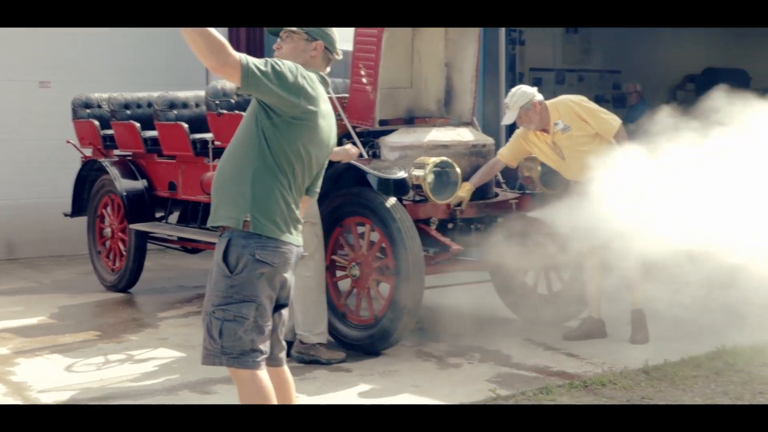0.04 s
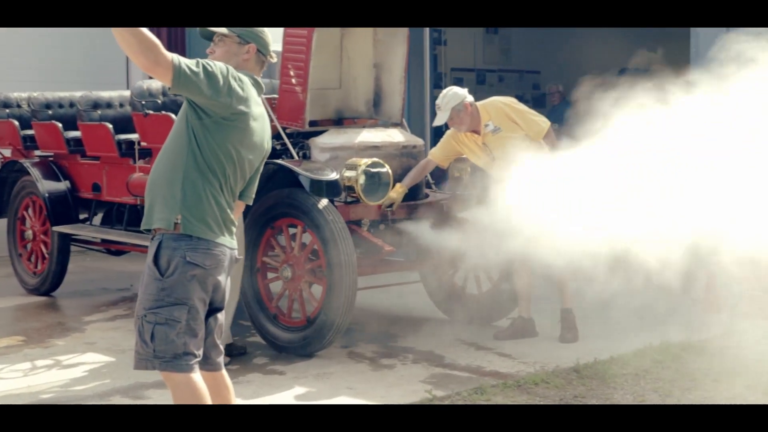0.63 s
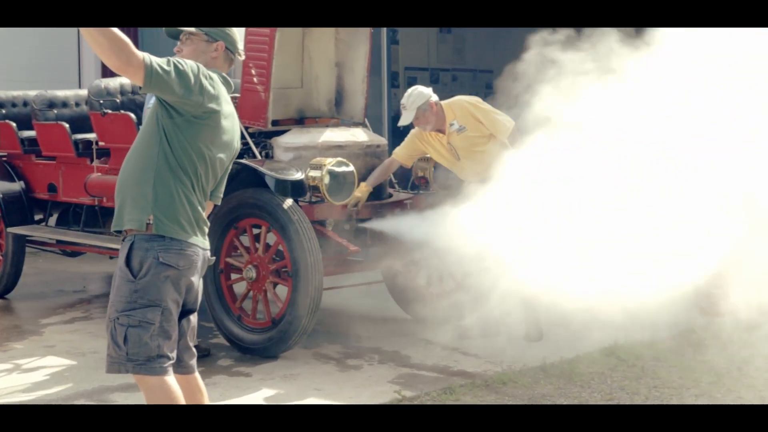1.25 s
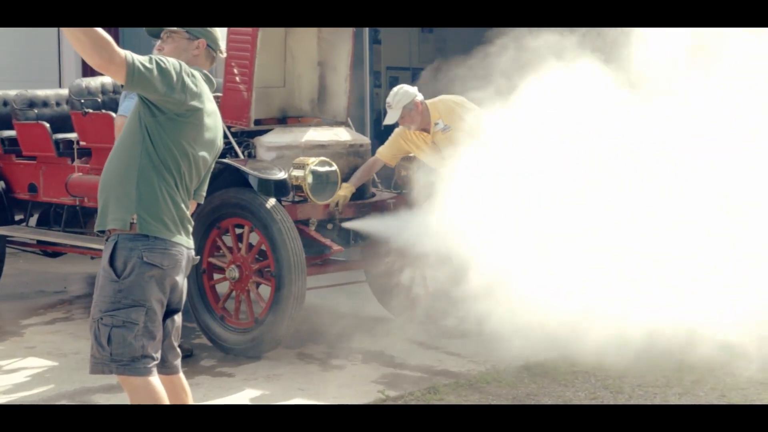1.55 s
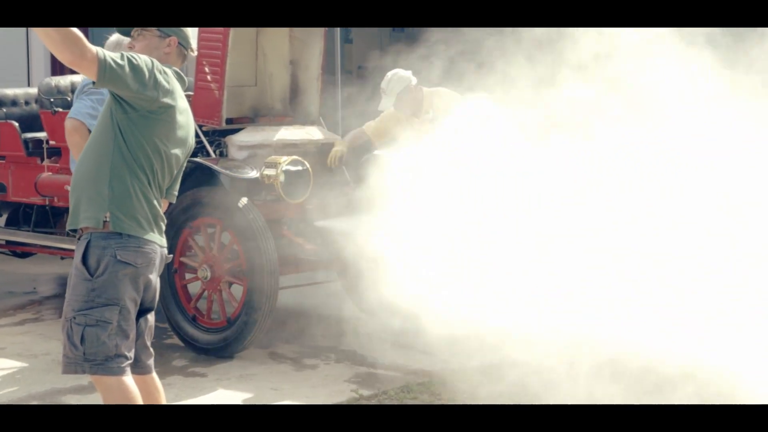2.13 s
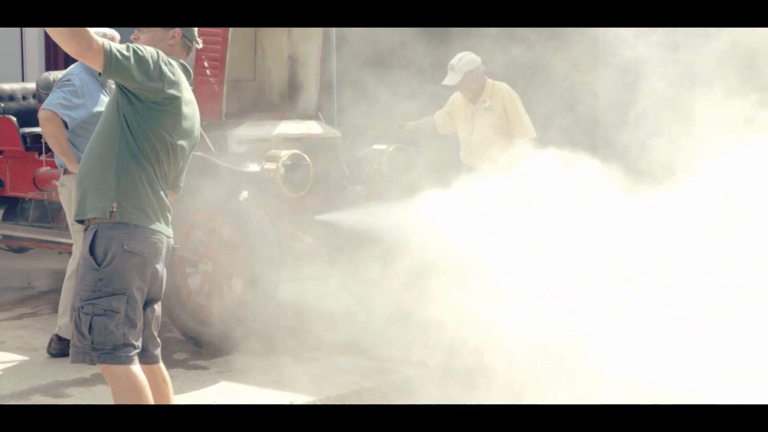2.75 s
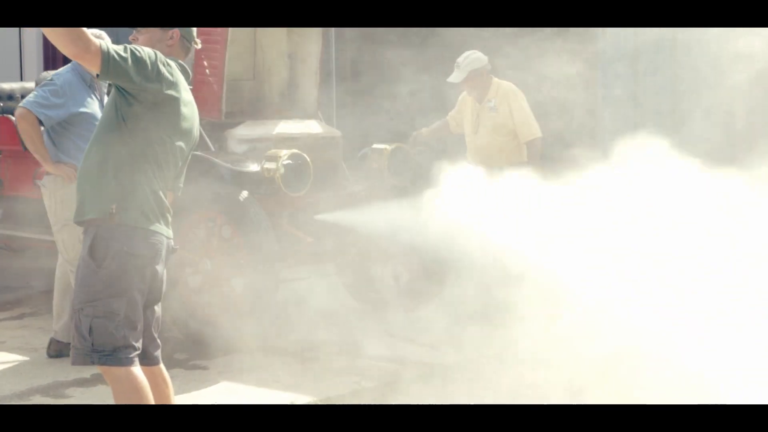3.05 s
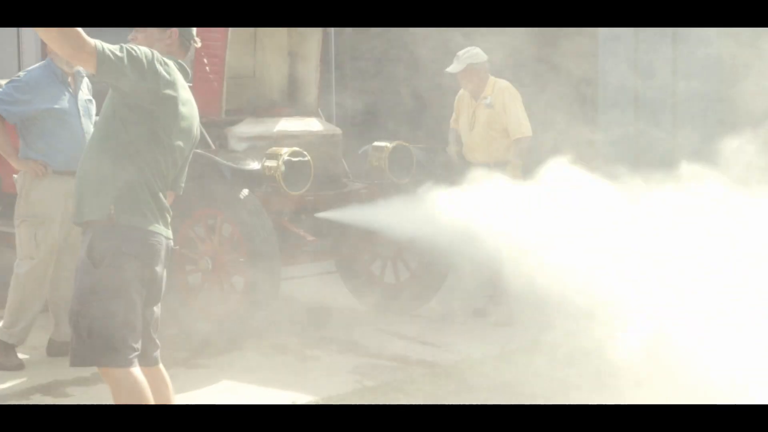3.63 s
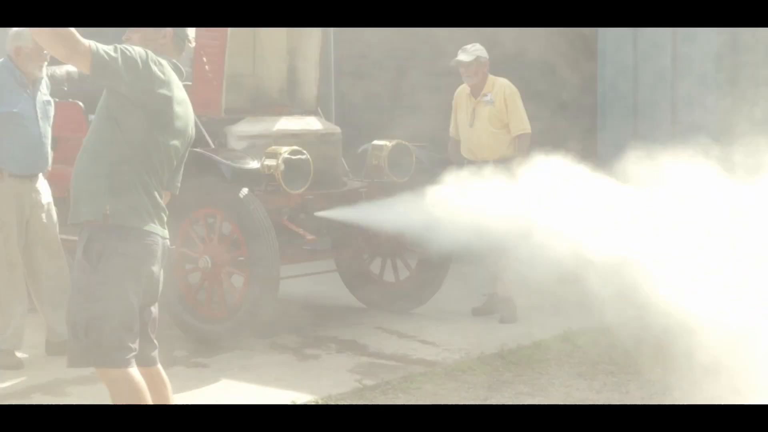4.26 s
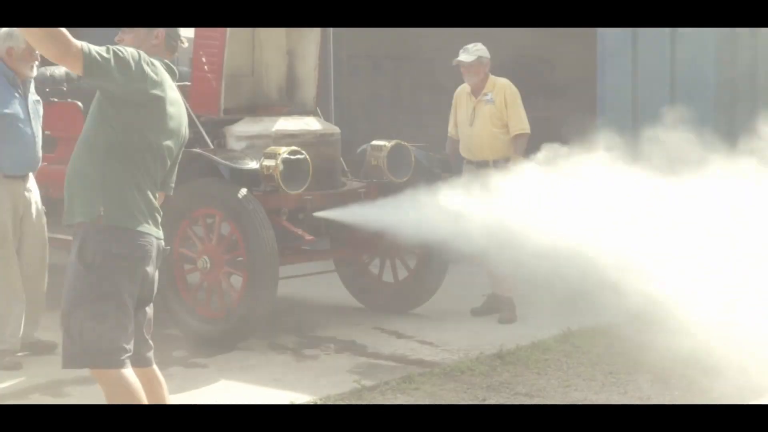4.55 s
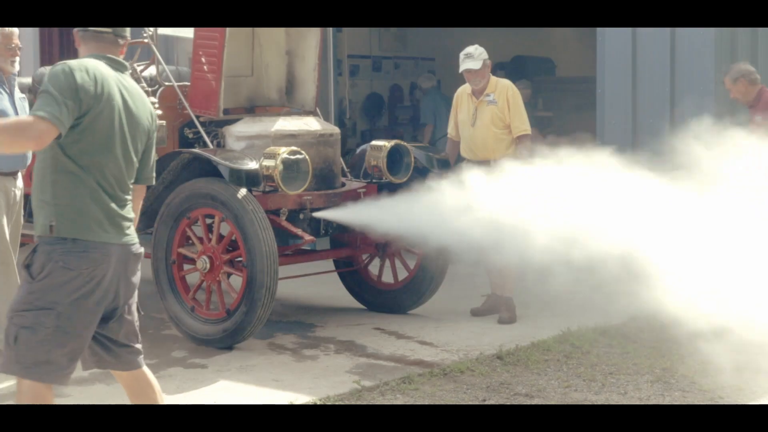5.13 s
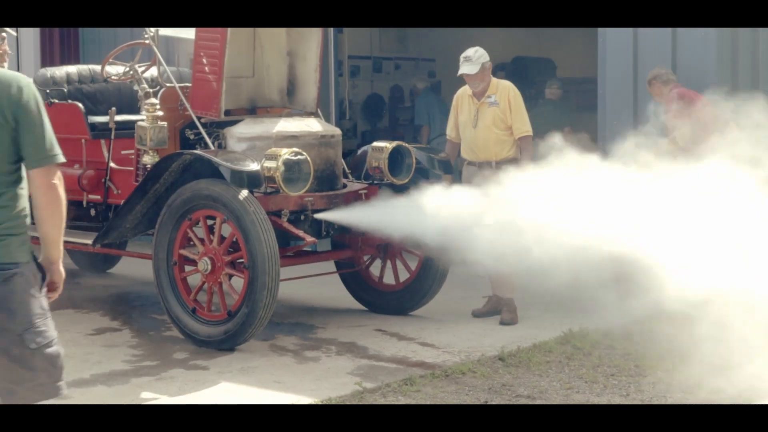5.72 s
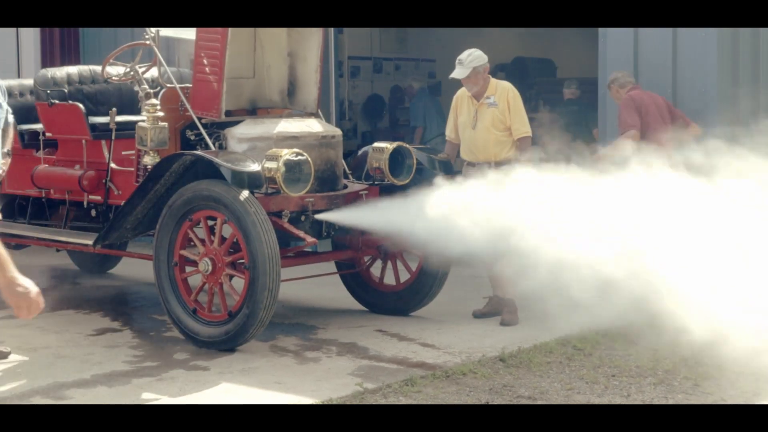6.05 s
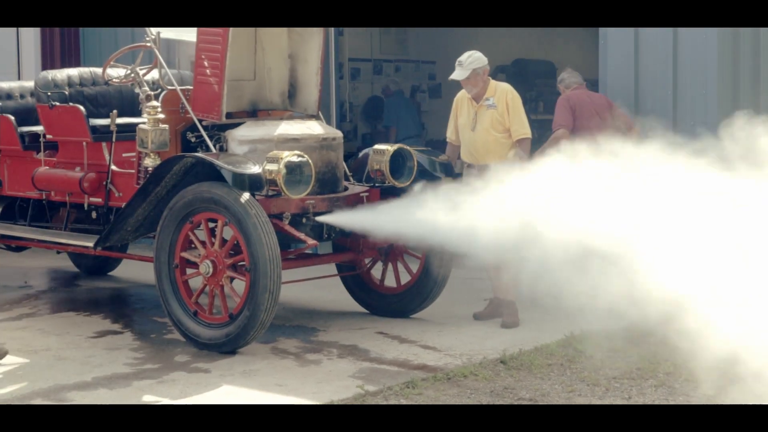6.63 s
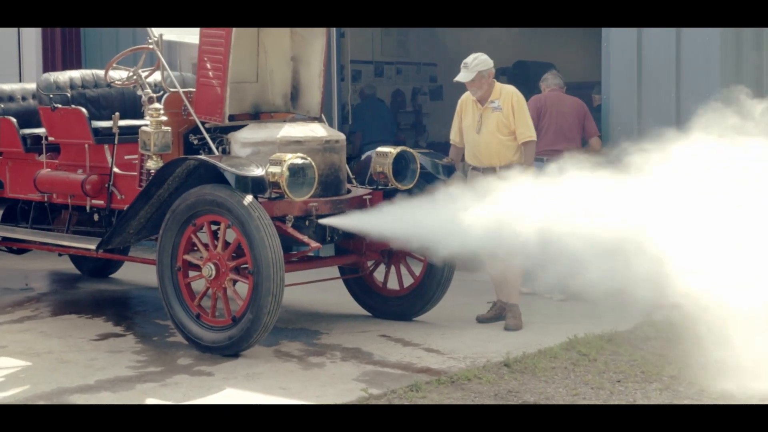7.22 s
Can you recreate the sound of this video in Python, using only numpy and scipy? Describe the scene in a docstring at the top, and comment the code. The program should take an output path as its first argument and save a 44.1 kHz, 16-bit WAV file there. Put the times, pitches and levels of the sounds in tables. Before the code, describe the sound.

Steam blows off from an old car's valve outdoors, a throttled, faintly whistling roar opening into a bright, steady hiss.

```python
"""Outdoors, a few metres from an old steam car: steam blows off from a valve low on its front.
The jet first roars half throttled, with faint whistles, then opens into a bright, steady hiss.
Its turbulence is coloured by the valve passage and the outlet pipe. Pavement, car body and garage
front reflect it, and the billowing plume adds a faint rumble."""
import sys
import numpy as np
from scipy import signal
from scipy.fft import rfft, irfft
from scipy.io import wavfile
from scipy.ndimage import map_coordinates

SR = 44100
rng = np.random.default_rng(int(sys.argv[2]) if len(sys.argv) > 2 else 0)


def int16_out(signal):
    """Quantize to a 16-bit WAV file."""
    q = np.round(np.clip(np.atleast_2d(signal).T, -1, 1) * 32767)
    wavfile.write(sys.argv[1], SR, q.astype(np.int16))


N = 325458
TIME = np.arange(N) / SR
FREQ = np.maximum(np.arange(N // 2 + 1) * SR / N, 1)


def valve(opening, surge, bright_db):
    """The throttled roar crossfades into the open hiss; a little of it lingers through the surge."""
    # turbulence at the valve, throttled and wide open: (frequency [Hz], relative level [dB])
    throttled_eq = [(400, -60), (590, -41), (710, -23.5), (1120, -17), (1490, -17.5), (1860, -0.5),
                    (2970, -8.5), (4370, -8.5), (4970, -4.5), (6760, -9), (7190, -13.5), (9970, -25.5),
                    (11760, -27), (15500, -39)]
    open_eq = [(400, -60), (590, -33.5), (720, -11), (1080, -13), (1430, -9.5), (1710, -12.5), (1830, -3.5),
               (3670, -6), (4740, -3), (6660, -8.5), (7180, -14.5), (11360, -17), (13030, -23),
               (15500, -26)]
    # resonances (+) and notches (-) of the valve passage: (frequency [Hz], width [Hz], gain [dB])
    throttled_modes = [(765, 325, 18.5), (1290, 400, 9.5), (2626, 70, 5), (3090, 410, 7), (3664, 140, -7.5),
                       (3760, 320, 9.5), (4840, 230, 6.5), (5580, 120, -6), (5710, 150, 2.5),
                       (9000, 340, -4), (9900, 480, 4.8)]
    open_modes = [(1192, 63, 4), (2352, 124, 6), (2517, 570, -8), (2940, 120, 2), (6130, 250, -3.5)]
    # each layer varies about its own average brightness
    roar_bright_db = bright_db - np.average(bright_db, weights=1 - opening)
    hiss_bright_db = bright_db - np.average(bright_db, weights=opening)
    roar = jet(outlet(throttled_eq, throttled_modes), roar_bright_db, flicker_hz=10, sputter_hz=25)
    hiss = jet(outlet(open_eq, open_modes), hiss_bright_db, flicker_hz=7.8, sputter_hz=23)
    roar_power = 1 - opening + 0.15 * opening * surge
    return np.sqrt(roar_power) * roar + np.sqrt(opening) * hiss


def jet(eq, bright_db, flicker_hz, sputter_hz):
    """Turbulent hiss in ten bands: each flickers alone, while the treble brightens and sputters as one."""
    spectrum = noise_spectrum(eq)
    sputter_db = .65 * drift(sputter_hz)
    centres_hz = np.geomspace(700, 14000, num=10)
    hiss = 0
    for hz, solo in zip(centres_hz, np.eye(len(centres_hz))):
        band = irfft(spectrum * np.interp(np.log(FREQ), np.log(centres_hz), solo), N)
        sensitivity = 1.7 / (1 + (9000 / hz) ** 4) - .1  # the finest eddies react most to the flow
        flicker_db = .4 * drift(flicker_hz)
        hiss += band * undb(sensitivity * (bright_db + sputter_db) + flicker_db)
    return hiss


def outlet(turbulence, modes, pipe_spacing_hz=1089, loss_hz=8000):
    """EQ of the jet: turbulence shaped by the valve passage, then ringing along the short pipe."""
    passage_db = sum(db / (1 + (2 * (FREQ - hz) / width) ** 2) for hz, width, db in modes)
    mouth_reflection = 0.25 / (1 + (FREQ / loss_hz) ** 2)
    round_trip = mouth_reflection * np.exp(-2j * np.pi * FREQ / pipe_spacing_hz)
    return colour(turbulence) * undb(passage_db) / (1 - round_trip)


def flow(opening, surge):
    """Level and brightness of the jet: it sags while throttled, surges on opening, then holds."""
    # the jet swells or flares brighter: (centre time [s], length [s], level [dB], brightness [dB])
    swells = [(0.83, 0.52, 1.1, -0.5), (1.63, 0.3, 1.2, -0.6), (2.33, 0.13, 0.5, -0.8),
              (2.49, 0.36, -0.2, 5), (3.02, 0.44, 0.5, 3.5), (3.87, 0.3, 0.8, 0.8),
              (5.063, 0.32, 0.85, 0.8), (6.186, 0.52, 0.6, 3.5), (7.36, 0.4, 0.5, 1.5)]
    throttled_db = -20.5 - 1.25 * TIME  # the half-closed valve slowly loses flow
    open_db = -20.0 + 0.9 * surge
    level_db = (1 - opening) * throttled_db + opening * open_db
    bright_db = .65 * drift(rate_hz=9)
    for centre_s, length_s, louder_db, brighter_db in swells:
        swell = arch(centre_s, length_s) ** 2
        level_db += louder_db * swell
        bright_db += brighter_db * swell
    return level_db + 0.28 * drift(rate_hz=5.5), bright_db


def whistles():
    """Narrow bands of noise that swell, slide and fade as the steam catches on the valve's edge."""
    # breathy half-whistles:
    # (centre time [s], length [s], pitch [Hz], glide [Hz/s], width [Hz], peak level [dB])
    notes = [(0.103, 0.49, 2050, -82, 180, -35), (0.24, 0.83, 3245, 7, 68, -30),
             (.87, 0.49, 3890, -58, 70, -31), (0.716, 0.43, 4900, -350, 180, -31),
             (1.202, 0.45, 4800, -150, 80, -32), (1.68, 0.44, 4300, -100, 220, -33)]
    sound = 0
    for centre_s, length_s, hz, glide, width, db in notes:
        band = irfft(noise_spectrum(1 / (1 + (2 * (FREQ - hz) / width) ** 2)), N)
        frequency_shift = np.exp(1j * np.pi * glide * (TIME - centre_s) ** 2)
        sliding = np.real(signal.hilbert(band) * frequency_shift)
        sound += undb(db) * arch(centre_s, length_s) * sliding
    return sound


def pavement(x):
    """A ground bounce whose delay shifts as jet and listener move, so the hiss phases slightly."""
    # reflection off the pavement: (time [s], delay [ms], gain [ratio])
    bounce = [(0, 2.6, 0.12), (.4, 2.54, 0.15), (.75, 2.66, 0.087), (1.6, 2.67, 0.16), (2.9, 2.03, 0.073),
              (4.4, 2.32, 0.05), (7.38, 2.24, 0.054)]
    times, *columns = np.transpose(bounce)
    delay_ms, gain = (np.interp(TIME, times, column) for column in columns)
    return (x + gain * delayed(x, delay_ms)) / np.sqrt(1 + gain ** 2)


def yard(x, send_db, count):
    """Weak echoes off car body and garage front; their slow drift makes the grain of the hiss wander."""
    delays_ms = np.geomspace(4, 22, num=count)
    echoes = sum(delayed(x, ms + .3 * drift(rate_hz=.25)) for ms in delays_ms)
    # small surfaces throw back mostly the treble
    echoes = signal.sosfilt(signal.butter(1, 2000, "high", fs=SR, output="sos"), echoes)
    return x + undb(send_db) * echoes / np.sqrt(count)


def plume(opening):
    """Low rumble of the billowing cloud, stronger once the valve is open."""
    # large eddies of the plume: (frequency [Hz], relative level [dB])
    eddies = [(12, -30), (28, -16), (60, -6), (110, -3.5), (165, 1.5), (285, -2.5), (365, 1), (435, 0.5),
              (520, -3.5), (620, -3), (900, -32)]
    rumble = irfft(noise_spectrum(colour(eddies)), N)
    level_db = -51 + 1.5 * (opening - 0.5)
    billow_db = 1.7 * drift(rate_hz=11)
    return rumble * undb(level_db + billow_db)


def undb(db):
    """Decibels to gain."""
    return 10 ** (np.asarray(db) / 20)


def colour(points):
    """EQ gain curve through points of (frequency [Hz], level [dB])."""
    hz, db = np.transpose(points)
    return undb(np.interp(np.log(FREQ), np.log(hz), db))


def noise_spectrum(eq):
    """Spectrum of a noise of rms 1, coloured by the EQ curve."""
    return rfft(rng.standard_normal(N)) * eq / np.sqrt(np.mean(np.abs(eq) ** 2))


def drift(rate_hz):
    """Smooth random modulation with a spread of 1, rolling off above rate_hz."""
    wander = irfft(noise_spectrum(1 / (1 + (FREQ / rate_hz) ** 2)), N)
    return wander / np.std(wander)


def delayed(x, delay_ms):
    """A delay line with a moving delay time."""
    return map_coordinates(x, [np.arange(N) - delay_ms * SR / 1000], order=5)


def fade_in(centre_s, length_s):
    """An S-shaped fade from 0 to 1."""
    return .5 + .5 * np.tanh(2 * (TIME - centre_s) / length_s)


def arch(centre_s, length_s):
    """A half-sine envelope from 0 up to 1 and back."""
    return np.cos(np.pi * np.clip((TIME - centre_s) / length_s, -.5, .5))


def scene():
    """Jet with its reflections, whistles and plume, alike in both channels."""
    opening = fade_in(centre_s=1.52, length_s=0.07)  # the valve comes fully open
    surge = 1 - fade_in(centre_s=2.83, length_s=0.55)  # the extra flow after opening dies away
    level_db, bright_db = flow(opening, surge)
    direct = valve(opening, surge, bright_db) * undb(level_db)
    steam = yard(pavement(direct), send_db=-8.0, count=8)
    mix = steam + whistles() + plume(opening)
    return np.array([mix, mix])


def record(dry, top_hz=15700):
    """Soft saturation rounds the highest peaks a little, and a steep low-pass cuts the top."""
    rounded = np.tanh(.8 * dry) / .8
    return signal.sosfilt(signal.ellip(12, .1, 80, top_hz, fs=SR, output="sos"), rounded)


dry = scene()
out = record(dry)
int16_out(out)
```